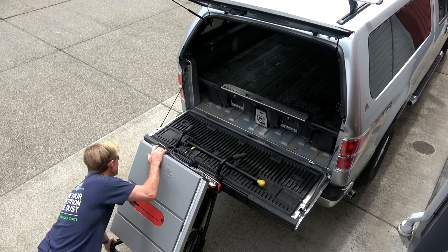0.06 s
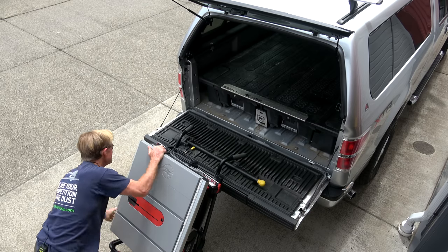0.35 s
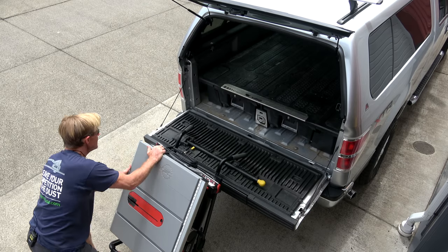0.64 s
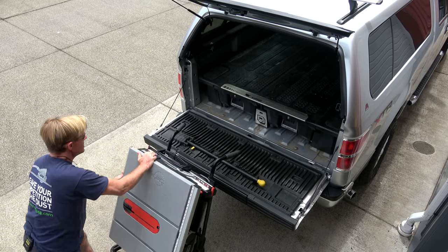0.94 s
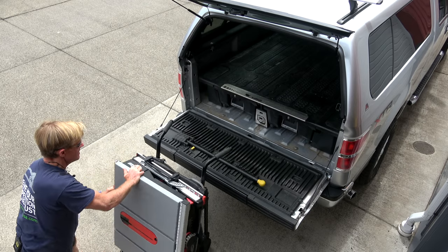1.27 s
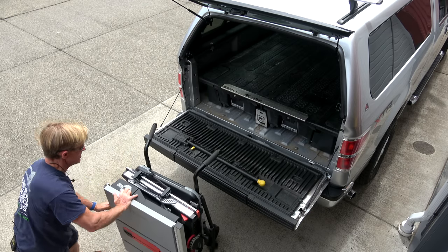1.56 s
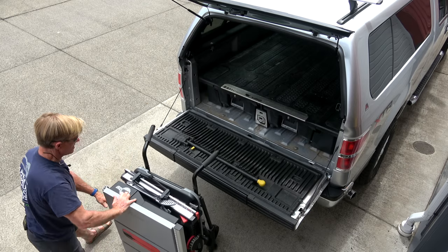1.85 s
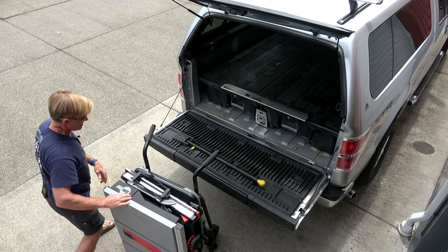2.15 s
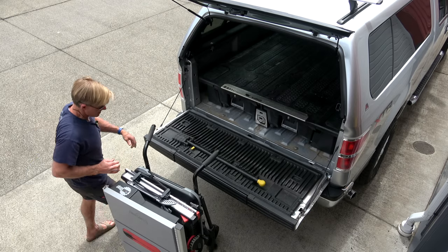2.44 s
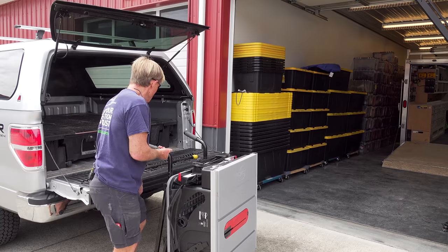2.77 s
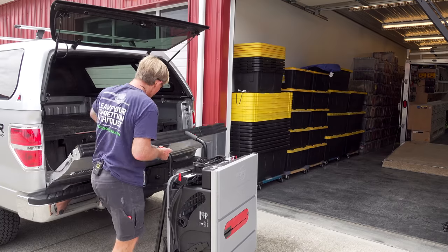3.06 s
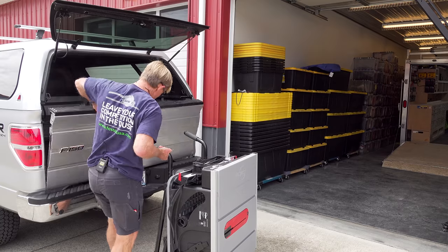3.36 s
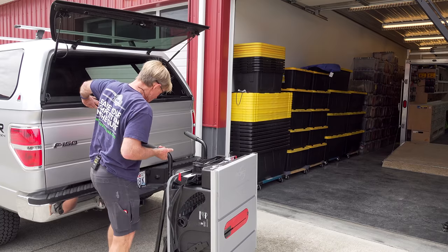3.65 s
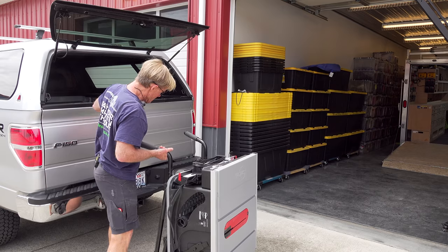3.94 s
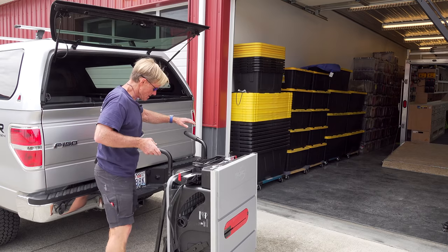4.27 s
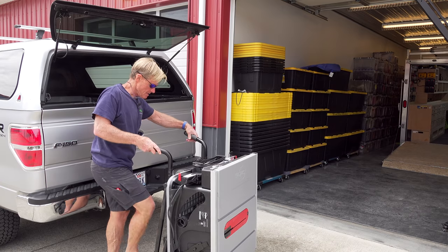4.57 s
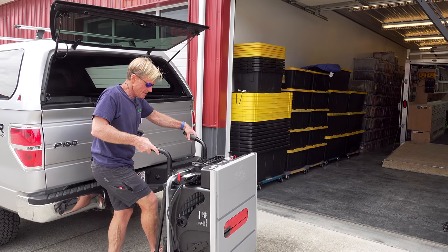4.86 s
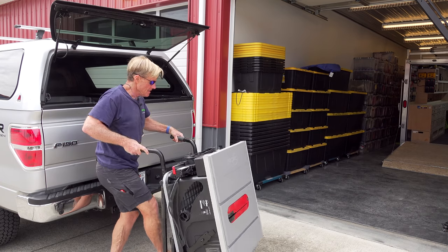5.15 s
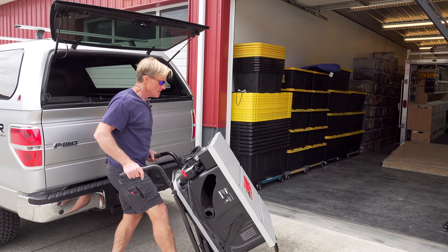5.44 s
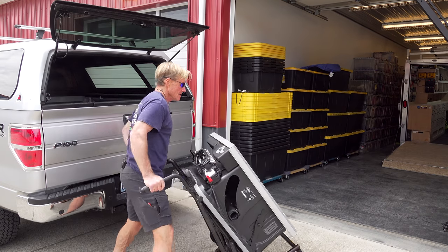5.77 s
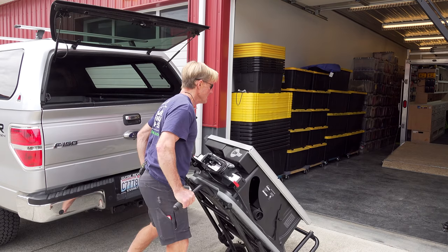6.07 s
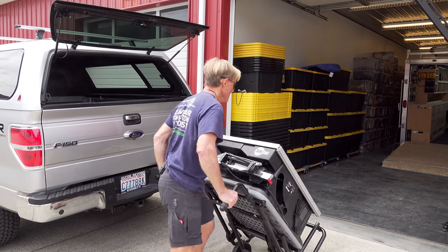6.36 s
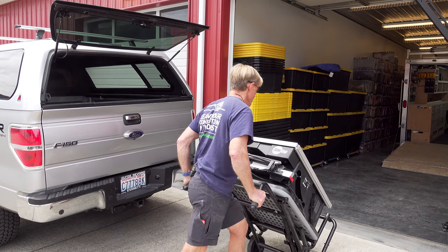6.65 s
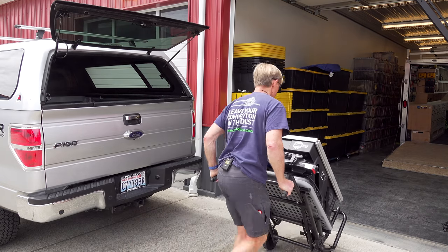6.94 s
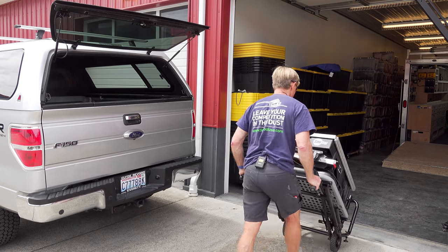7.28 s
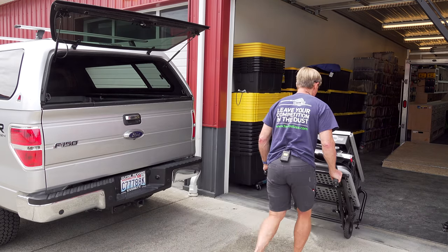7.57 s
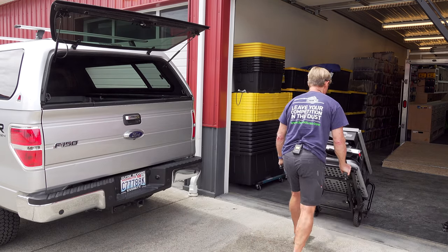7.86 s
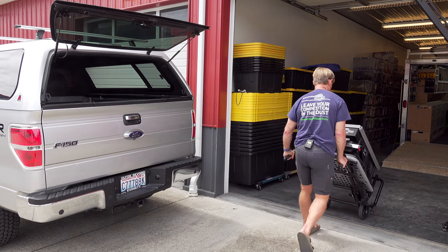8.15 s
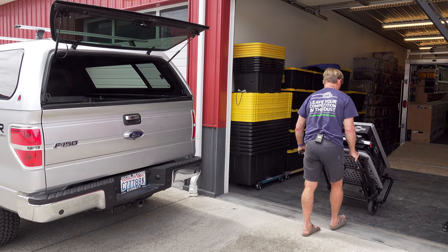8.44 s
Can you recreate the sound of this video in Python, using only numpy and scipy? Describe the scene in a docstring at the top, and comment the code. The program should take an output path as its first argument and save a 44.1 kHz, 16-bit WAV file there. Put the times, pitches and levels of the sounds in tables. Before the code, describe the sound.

Outdoors, a steel stand lands with a jangle, a truck's tailgate bangs shut, then hard wheels rumble and bump over a threshold.

```python
"""A folded saw stand of steel tube is tipped off a pickup's tailgate and lands, rattling, on concrete.
Each blow is a thump, a ringing frame, a clank and a jingle of loose parts. Sandals scuff on grit; the
tailgate swings up with a squeak and slams, latches snapping and truck bed booming. The stand is tilted
onto its wheels, rumbles over the yard and bumps across the sill of a warehouse.
Underneath lie steady air, a low drone and the yard's faint reverb."""
import sys
import numpy as np
from scipy import signal
from scipy.fft import rfft, irfft, next_fast_len
from scipy.io import wavfile
from scipy.ndimage import uniform_filter1d

SR = 44100
rng = np.random.default_rng(int(sys.argv[2]) if len(sys.argv) > 2 else 0)


def generate_wav(signal):
    """Clip the signal to [-1, 1] and save it as 16-bit WAV at the path in sys.argv[1]."""
    frames = np.transpose(np.atleast_2d(signal))
    scaled = np.clip(frames, -1, 1) * 32767
    pcm = np.round(scaled).astype(np.int16)
    wavfile.write(sys.argv[1], SR, pcm)


N = 375291

# spectra of the outdoor air and the low drone: (f/Hz, level/dB)
AIR_COLOUR = [(20, 6.5), (220, 5), (500, -1.5), (930, -3), (1500, -11.5), (2600, -18.5), (9500, -24.5),
              (15800, -24.5)]
DRONE_COLOUR = [(30, -32), (100, -5), (121, 3.5), (148, -6), (197, -1.5), (290, -11), (2000, -59.5)]
# swells of the drone, and soft low thuds: (peak t/s, level/dB, half length/s)
DRONE_SWELLS = [(0, -43, 0.17), (4.2, -43.5, 0.37)]
THUDS = [(2.121, -36.5, 0.038), (2.583, -46.5, 0.071), (4.386, -38.5, 0.017)]
# the yard's reverb time: (f/Hz, t60/s)
YARD_DECAY = [(100, 1), (1000, 1), (4000, 1), (12000, 0.61)]
# clicks of grit and fittings: (t/s, level/dB, centre f/Hz, roll-off one octave out/dB, t60/s)
CLICKS = [(0.646, -45, 3130, 10, 0.036), (1.109, -51, 5460, 2, 0.054), (1.4507, -53, 3160, 20, 0.016),
          (1.4812, -47, 5000, 1, 0.012), (2.1167, -49, 1980, 5, 0.12), (2.6318, -42, 2180, 12, 0.022),
          (2.7, -51, 11000, 19, 0.054), (3.184, -48, 9000, -14, 0.012), (4.313, -50, 2780, 2, 0.29),
          (6.6867, -51, 2660, -2, 0.057), (7.5412, -56, 4680, 18, 0.1)]
# soles, hands and loose parts rub: (t/s, level/dB, attack/s, centre f/Hz, roll-off one octave out/dB)
SCUFFS = [(0.125, -54.5, 0.032, 9000, 2), (0.16, -56.5, 0.025, 5200, 27), (0.619, -47.5, 0.013, 2700, 2),
          (0.719, -49.5, 0.012, 3400, 4.5), (0.844, -50, 0.008, 5800, 2.5), (1.153, -56, 0.0086, 2400, 10),
          (1.252, -47, 0.013, 4530, 3), (1.375, -52, 0.0081, 4100, 25), (2.560, -41.5, 0.019, 2930, 4.5),
          (2.682, -47.5, 0.01, 4960, -2), (3.830, -52, 0.014, 6070, 77), (3.918, -58, 0.012, 6200, 74),
          (6.074, -53.5, 0.017, 4600, 4), (6.169, -48, 0.017, 2090, 2)]

# hit cues: (t/s, strength/dB, hardness/dB, rebounds/count)
# a dull handling knock, then hinges and stays clack as the tailgate lifts
LEAD_IN_HITS = [(2.787, -31.5, -12, 0), (3.267, -19.5, 2, 0), (3.374, -41, 11.5, 0), (3.437, -37, 6, 0)]
GATE_SLAM = [(3.551, -17.5, 9.5, 0), (3.576, -5.5, 1.5, 0), (3.591, -5.5, -1.5, 5), (3.603, -10.5, 1, 0),
             (3.620, -9, 3, 0), (3.665, -19.5, 10.5, 0), (3.683, -13, -1.5, 0), (3.724, -19, 6, 0),
             (3.835, -24.5, 4.5, 0), (3.896, -25.5, -6.5, 0)]  # latches snap, the tailgate slams home and settles
KNOCKS = [(0.121, -11, -0.5, 1)]  # the stand's tube on the tailgate's edge
STAND_JOLTS = [(0.757, -30, -10, 0), (1.508, -29.5, 3, 0), (1.559, -7, -1, 2), (1.574, -10, -1, 0),
               (1.727, -8.5, 0, 0), (1.742, -12, 4, 0), (1.778, -13.5, 0.5, 1), (1.886, -20.5, -1, 0),
               (1.938, -22.5, 1, 0), (2.054, -29, -4, 0), (2.200, -35.5, -3, 0), (4.828, -37, -4.5, 0),
               (4.927, -30, 1, 0), (4.960, -31, -2.5, 0), (4.999, -28.5, -30, 0), (5.374, -36, -3.5, 0),
               (5.679, -35.5, 4, 0), (7.742, -32, -20, 0), (7.945, -22.5, -2.5, 0), (7.958, -14, -1, 0),
               (7.988, -18.5, 6.5, 0), (8.052, -13.5, -1, 0), (8.087, -12, 1, 0), (8.108, -13.5, 3, 0),
               (8.117, -19.5, 5, 0), (8.170, -21, -0.5, 1)]  # the stand lands, tilts and crosses the sill
# layer balance of a hit: (thump/dB, frame/dB, clank/dB, jingle/dB)
LEAD_IN_MIX_DB = [-27, -8.5, -14, -26]
SLAM_MIX_DB = [-16, -10.5, -15, -21]
KNOCK_MIX_DB = [-23.5, -10.5, -17, -31]
STAND_MIX_DB = [-24, -6.5, -19, -26.5]
# loss per rebound: (thump/dB, frame/dB, clank/dB, jingle/dB)
GATE_LOSS_DB = [.8, 1.3, 2.5, 4]
KNOCK_LOSS_DB = [10, 7.6, 12, 7.2]
STAND_LOSS_DB = [4, 5.3, 3.1, 1.3]
# each body's strongest modes: (f/Hz, level/dB, t60/s)
STAY_MODES = [(3220, -33, .055), (5400, -40, .04)]
GATE_MODES = [(84.6, -4, 0.4), (159.6, 1, 0.4), (173.3, 2, 0.54), (394.6, 4, 0.45), (479, -7, 0.29),
              (596, -6, 0.19), (677, -7, 0.3), (900, -9, 0.27)]
CATCH_MODES = [(4080, -16, 0.19), (5292, -15, 0.18), (5600, 0, 0.088), (11000, -11, 0.11)]
KNOCK_MODES = [(138, -17, 0.38), (273, -12.5, 0.42), (607, -10, 0.087), (723, -3, 0.081), (908, -9.5, 0.13),
               (1550, -8.5, 0.028), (2180, -4.5, 0.017), (3000, -17, 0.022)]
TUBE_MODES = [(3957, 1, .38), (4020, -4, .33), (4170, -5, .36), (5290, -7, .18), (5566, -3, .2),
              (7036, -10, .2), (11300, -11, .14)]
STAND_MODES = [(169.8, -6.5, 0.33), (210, -5, 0.25), (249.6, -8, 0.39), (317.4, 2, 0.15),
               (358.3, -1.5, 0.17), (738, -16, 0.14)]
# spectrum of each body's wash of weaker modes: (f/Hz, level/dB)
GATE_COLOUR = [(25, -13), (55, -15), (85, -6.5), (135, -6), (165, -1), (316, -5), (587, -7), (1250, -17),
               (1870, -25), (3500, -25), (5000, -32), (15800, -31)]
CATCH_COLOUR = [(2500, -30), (6300, -9.5), (9500, -25.5), (13000, -15), (15800, -31)]
KNOCK_COLOUR = [(40, -13), (150, -2), (300, 7), (800, 11), (2200, -16), (4000, -13), (15000, -29)]
STAND_COLOUR = [(18, -45), (30, -28), (90, -15), (140, -13.5), (180, -3.5), (244, -5), (566, -8),
                (1210, -20), (1890, -18.5), (3540, -27), (5540, -20.5), (8870, -28.5), (13900, -27),
                (15800, -39)]
# ring-out of that wash: (f/Hz, t60/s)
GATE_DECAY = [(60, 0.6), (250, 0.3), (900, 0.26), (2500, 0.13), (6000, 0.14), (14000, 0.038)]
CATCH_DECAY = [(4000, 0.096), (14000, 0.078)]
KNOCK_DECAY = [(150, 0.38), (800, 0.063), (8000, 0.31)]
STAND_DECAY = [(60, 0.29), (250, 0.2), (900, 0.16), (14000, 0.13)]
# a steel catch clinks as the stand lands, tilts and jolts: (t/s, level/dB)
CLINKS = [(1.609, -37), (1.651, -37), (1.748, -32), (1.781, -37.5), (1.81, -34), (5.625, -50), (5.671, -53),
          (5.776, -34.5), (7.989, -34.5)]

# the roll builds towards the sill, then eases on the smooth floor: (t/s, level/dB)
ROLL_FADER = [(6.5, -90), (6.9, -55.5), (7.2, -46), (7.8, -41), (7.9, -45), (8.51, -54)]
# spectrum of the wheels' rumble: (f/Hz, level/dB)
ROLL_COLOUR = [(50, -9), (130, -1), (225, 3.5), (500, -5), (950, -17), (1300, -23), (3300, -45),
               (15000, -110)]
# wheel swells: (peak t/s, level/dB, half length/s)
SHOVES = [(0.755, -39, 0.039), (1.425, -40, 0.016), (1.52, -35, 0.032), (5.03, -43, 0.085),
          (5.43, -46.5, 0.1), (5.95, -51, 0.16), (7.975, -27, 0.018)]  # pushes and the sill scrub the wheels on the concrete
HOLLOW_SWELLS = [(7.55, -59, 0.25)]  # the hard wheels sing across the yard

LOOSENESS = 0.011  # share by which loose joints detune a mode


def amp(db):
    """Decibels to gain."""
    return np.exp(np.asarray(db) * (np.log(10) / 20))


def unit_rms(x):
    """Normalises to an rms of one."""
    return x / np.sqrt(np.mean(x ** 2) + 1e-20)


def unit_crest(x, size=441):
    """Normalises the loudest stretch of `size` samples to an rms of one."""
    return x / np.sqrt(uniform_filter1d(x ** 2, size, mode="constant").max() + 1e-20)


def read(points, hz):
    """Reads a curve of (f/Hz, value) on a log-frequency axis."""
    f, value = np.transpose(points)
    return np.interp(np.log(hz + 1), np.log(f + 1), value)


def add(mix, s, sound):
    """Mixes a sound in at time s."""
    start = round(s * SR)
    sound = sound[max(-start, 0):]
    part = mix[max(start, 0):][:len(sound)]
    part += sound[:len(part)]


def band(x, hz, kind, order=3):
    """Causal low-, high- or band-pass."""
    return signal.sosfilt(signal.butter(order, hz, kind, fs=SR, output="sos"), x)


def coloured(x, colour):
    """Puts x through an EQ curve, at an rms of one."""
    size = next_fast_len(len(x))
    eq = amp(read(colour, np.fft.rfftfreq(size, 1 / SR)))
    return unit_rms(irfft(rfft(x, size) * eq, size)[:len(x)])


def bell_eq(x, centre_hz, slope_db):
    """A broad resonance, down by slope_db (at least 1 dB) one octave out, at an rms of one."""
    octaves = np.log2((np.fft.rfftfreq(len(x), 1 / SR) + 1) / centre_hz)
    return unit_rms(irfft(rfft(x) * amp(-max(slope_db, 1) * octaves ** 2), len(x)))


def damped(x, decay):
    """Lets each frequency of x die at its own speed."""
    hz, t, spectrum = signal.stft(x, SR, nperseg=256)
    fade = amp(-60 * t / read(decay, hz)[:, None])
    return signal.istft(spectrum * fade, SR, nperseg=256)[1][:len(x)]


def fader(curve):
    """A gain ride through rows of (t/s, level/dB), silent outside them."""
    s, db = np.transpose(curve)
    return amp(np.interp(np.arange(N) / SR, s, db, left=-120, right=-120))


def swells(rows):
    """A gain ride with one smooth rise and fall per row."""
    t = np.arange(N) / SR
    return sum(amp(db) * np.exp(-.5 * ((t - s) / half_s) ** 2) for s, db, half_s in rows)


def crackle(size, per_s):
    """Sparse impulses of random strength."""
    return rng.standard_normal(size) * (rng.random(size) < per_s / SR)


def ring(modes, colour, decay, modes_db, size=24576):
    """A struck body: clear modes over a wash of weaker ones; the spot hit sets each mode's polarity."""
    t = np.arange(size) / SR
    wash = damped(coloured(rng.standard_normal(size), colour), decay)
    signs = rng.choice([-1, 1], len(modes))
    tones = sum(sign * amp(db - 60 * t / t60) * np.sin(2 * np.pi * hz * t)
                for sign, (hz, db, t60) in zip(signs, modes))
    return unit_crest(wash) + amp(modes_db) * unit_crest(tones)


def chatter(fade_s, per_s, gain, size=8192):
    """One contact, then loose parts striking again, ever more weakly."""
    t = np.arange(size) / SR
    force = gain * crackle(size, per_s) * np.exp(-t / fade_s)
    force[0] = 1
    return force


def bounces(hits, mix_db, loss_db, period_s, scatter=.22):
    """Hits rebound unevenly, ever weaker, giving contacts of (t/s, four layer levels/dB)."""
    contacts = []
    for s, strength_db, hard_db, rebounds in hits:
        first_db = strength_db + np.array(mix_db) + hard_db * np.array([0, 0, 1, 1])  # hard is bright
        for k in range(round(rebounds) + 1):
            slip = min(k, 1) * scatter * rng.uniform(-1, 1)
            contacts.append((s + (k + slip) * period_s, first_db - k * np.array(loss_db)))
    return contacts


def blows(contacts, modes, colour, decay, modes_db, attack_s, chatter_s, per_s, rattle, spot_count=7):
    """Each contact, on one of a few spots, shakes the whole mass, frame, panels and loose fittings."""
    out = np.zeros(N)
    detunes = 1 + LOOSENESS * rng.uniform(-1.07, 1, (min(spot_count, len(contacts)), len(modes)))
    tunings = [[(hz * by, db, t60) for (hz, db, t60), by in zip(modes, row)] for row in detunes]
    spots = [ring(tuning, colour, decay, modes_db) for tuning in tunings]
    attack = 1 - np.exp(-np.arange(len(spots[0])) / SR / attack_s)  # the shock takes time to spread
    for k, (s, layers_db) in enumerate(contacts):
        shaken = amp(0.56 * min(layers_db[1] + 41, 0))  # frame hits under -41 dB chatter less
        force = chatter(chatter_s, per_s, rattle * shaken)
        struck = signal.fftconvolve(spots[k % spot_count] * attack, force)[:len(attack)]
        thump = unit_crest(band(struck, 113, "low", order=4), size=1100)
        frame = unit_crest(band(struck, [150, 1000], "band"))
        clank = unit_crest(band(struck, [1100, 3600], "band"), size=300)
        jingle = unit_crest(band(struck, 2870, "high"), size=220)
        add(out, s - attack_s / 2, amp(layers_db) @ np.array([thump, frame, clank, jingle]))
    return out


def outdoors(air_db=-53, drone_floor_db=-57.5, size=32768):
    """The ambience bed: steady air, a swelling low drone and a few soft thuds."""
    out = amp(air_db) * coloured(rng.standard_normal(N), AIR_COLOUR)
    out += (amp(drone_floor_db) + swells(DRONE_SWELLS)) * coloured(rng.standard_normal(N), DRONE_COLOUR)
    t = (np.arange(size) - size / 2) / SR
    for s, db, half_s in THUDS:
        lows = bell_eq(rng.standard_normal(size), centre_hz=58.7, slope_db=10.5)
        thud = lows * np.exp(-.5 * (t / half_s) ** 2)
        add(out, s + t[0], amp(db) * unit_crest(thud, size=1100))
    return out


def yard_reverb(send, predelay_s=.012, echoes_per_s=2500):
    """The truck, the wall and the open warehouse return a tail of reflections."""
    taps = rng.choice([-1., 1.], SR) * (rng.random(SR) < echoes_per_s / SR)
    tail = damped(taps * (np.arange(SR) > predelay_s * SR), YARD_DECAY)
    return signal.fftconvolve(send, tail / np.linalg.norm(tail))[:N]


def clicks(size=8192):
    """Grit and fittings make short, hard contacts, some broad, some pitched."""
    out, t = np.zeros(N), np.arange(size) / SR
    for s, db, hz, slope_db, t60 in CLICKS:
        click = bell_eq(rng.standard_normal(size), hz, slope_db) * amp(-60 * t / t60)
        add(out, s, amp(db) * unit_crest(click, size=88))
    return out


def scuffs(grains_per_s=6000, spread_db=3.5, size=16384):
    """Grains of uneven size crackle as a surface catches quickly and slides to rest."""
    out, t = np.zeros(N), np.arange(size) / SR
    for s, db, rise_s, hz, slope_db in SCUFFS:
        grains = rng.standard_normal(size) * amp(spread_db * np.minimum(rng.exponential(1, size), 4))
        grains *= rng.random(size) < grains_per_s / SR
        scrape = unit_rms(band(bell_eq(grains, hz, slope_db), 520, "high"))
        envelope = t / rise_s * np.exp(1 - t / rise_s)
        add(out, s, amp(db) * scrape * envelope)
    return out


def hinge(start_s=3.155, length_s=0.078, peak_hz=5250, sag_hz=450, jitter_hz=190, squeak_db=-58):
    """The tailgate's dry hinge gives one thin, unsteady squeak that arches in pitch."""
    out, arc = np.zeros(N), np.linspace(-1, 1, round(length_s * SR))
    jitter = unit_rms(uniform_filter1d(rng.standard_normal(len(arc)), size=20))
    hz = peak_hz - sag_hz * arc ** 2 + jitter_hz * jitter
    squeak = np.sin(2 * np.pi * np.cumsum(hz) / SR)
    add(out, start_s, amp(squeak_db) * (1 - arc ** 2) ** 2 * squeak)
    return out


def stay(start_s=3.269, size=16384):
    """The tailgate's steel stay pings with two high modes as it goes slack."""
    out, t = np.zeros(N), np.arange(size) / SR
    ping = sum(amp(db - 60 * t / t60) * np.sin(2 * np.pi * hz * t) for hz, db, t60 in STAY_MODES)
    add(out, start_s, ping)
    return out


def tailgate(judder_s=.033):
    """After a dull handling knock the tailgate clacks up and slams; latches snap, the truck bed booms."""
    lead_in = bounces(LEAD_IN_HITS, LEAD_IN_MIX_DB, GATE_LOSS_DB, judder_s)
    slam = bounces(GATE_SLAM, SLAM_MIX_DB, GATE_LOSS_DB, judder_s)
    return blows(lead_in + slam, GATE_MODES, GATE_COLOUR, GATE_DECAY, modes_db=-8,
                 attack_s=0.0018, chatter_s=0.0077, per_s=400, rattle=0.65)


def grit(per_s=500, gain_db=-57, centre_hz=3300, t60=0.029, follow=0.31, size=4096):
    """Fine grit crunches under the wheels, loosely following the level of the roll."""
    t = np.arange(size) / SR
    tick = bell_eq(rng.standard_normal(size), centre_hz, slope_db=2) * amp(-60 * t / t60)
    taps = crackle(N, per_s) * (fader(ROLL_FADER) + swells(SHOVES)) ** follow
    return amp(gain_db) * signal.oaconvolve(taps, unit_crest(tick, size=88))[:N]


def wheels(hollow_band_hz=(895, 1025), lumpy_db=2.5, patch_samples=1500):
    """Patchy concrete taps the hard wheels; they rumble and sing hollowly, and the frame hums along."""
    patches = uniform_filter1d(rng.standard_normal(N), patch_samples)
    lumps = unit_rms(uniform_filter1d(patches, patch_samples))
    bumps = crackle(N, per_s=1500) * amp(lumpy_db * lumps)
    frame = signal.oaconvolve(bumps, ring(STAND_MODES, STAND_COLOUR, STAND_DECAY, modes_db=2.5))[:N]
    hollow = unit_rms(band(bumps, hollow_band_hz, "band", order=2))
    rumble = coloured(bumps, ROLL_COLOUR) + amp(-8.5) * unit_rms(band(frame, 3000, "low"))
    return (fader(ROLL_FADER) + swells(SHOVES)) * rumble + swells(HOLLOW_SWELLS) * hollow


def catch():
    """The stand's small steel catch rings high and briefly."""
    out = np.zeros(N)
    for s, db in CLINKS:
        clink = ring(CATCH_MODES, CATCH_COLOUR, CATCH_DECAY, modes_db=-1.5)
        add(out, s, amp(db) * unit_crest(clink, size=220))
    return out


def tubes(contacts, gain_db=-49.5, firm_jingle_db=-30, size=24576):
    """Every jolt sets the steel tubes ringing high; loose joints detune them a little each time."""
    out, t = np.zeros(N), np.arange(size) / SR
    hz, db, t60 = np.transpose(TUBE_MODES)[:, :, None]
    for s, layers_db in contacts:
        shift, share = rng.uniform(-1, 1, (2, len(hz), 1))
        detuned_hz = hz * (1 + .5 * LOOSENESS * shift)
        tones = 2 * share * amp(db - 60 * t / t60) * np.sin(2 * np.pi * detuned_hz * t)
        ring_db = gain_db + 0.64 * (layers_db[-1] - firm_jingle_db)  # grows more slowly than the hit
        add(out, s, amp(ring_db) * tones.sum(0))
    return out


def stand():
    """The stand knocks on the tailgate, then lands, tilts and jolts over the sill, rocking on its frame."""
    knocks = bounces(KNOCKS, KNOCK_MIX_DB, KNOCK_LOSS_DB, period_s=0.033)
    jolts = bounces(STAND_JOLTS, STAND_MIX_DB, STAND_LOSS_DB, period_s=0.049)
    edge = blows(knocks, KNOCK_MODES, KNOCK_COLOUR, KNOCK_DECAY, modes_db=1,
                 attack_s=0.00066, chatter_s=0.0071, per_s=320, rattle=0.24)
    shimmer = tubes(jolts)
    body = blows(jolts, STAND_MODES, STAND_COLOUR, STAND_DECAY, modes_db=-11,
                 attack_s=0.0017, chatter_s=0.026, per_s=240, rattle=0.62)
    return edge + shimmer + body


def scene():
    """The mono mix: stand and tailgate, each with its reverb send, over the ambience bed."""
    near = stand() + catch() + clicks() + scuffs() + wheels() + grit()
    gate = tailgate() + hinge() + stay()
    reverb = yard_reverb(amp(-18.5) * near + amp(-14.5) * gate)
    return (near + gate + reverb + outdoors())[None]


def record(dry, ceiling=.62, cutoff_hz=15900):
    """Soft clipping rounds the loudest peaks; a steep low-pass trims the top."""
    rounded = ceiling * np.tanh(dry / ceiling)
    lowpass = signal.firwin(511, cutoff_hz, window=("kaiser", 9), fs=SR)
    return signal.oaconvolve(rounded, lowpass[None], "same")


dry = scene()
out = record(dry)
generate_wav(out)
```